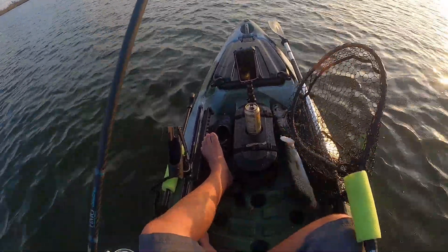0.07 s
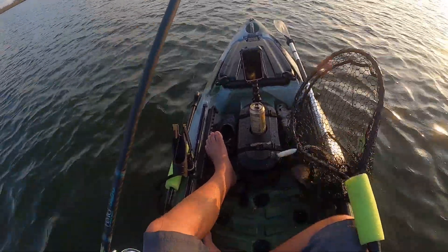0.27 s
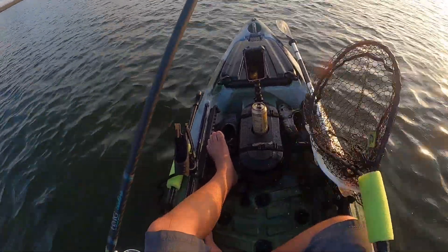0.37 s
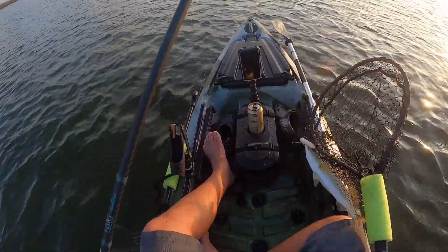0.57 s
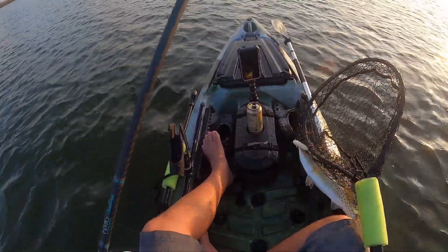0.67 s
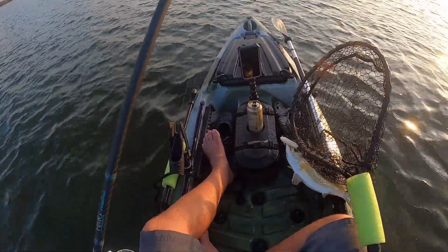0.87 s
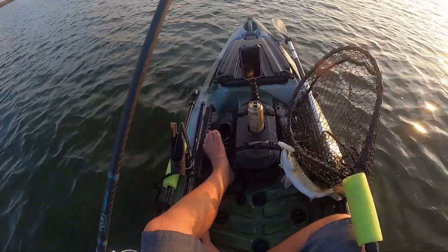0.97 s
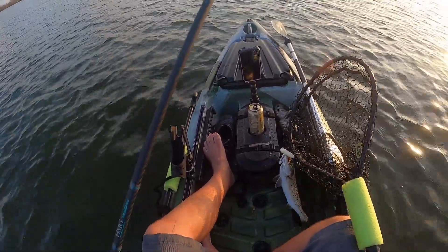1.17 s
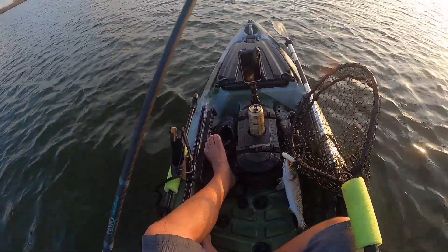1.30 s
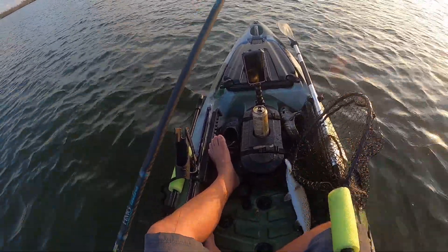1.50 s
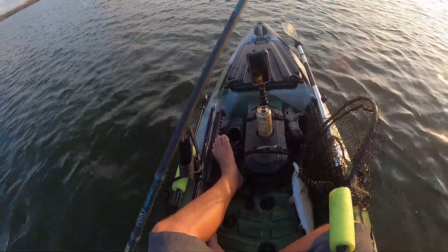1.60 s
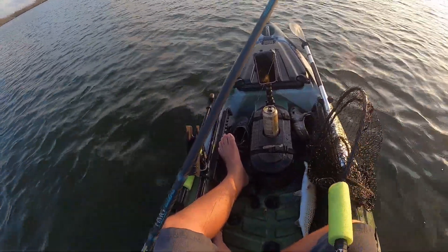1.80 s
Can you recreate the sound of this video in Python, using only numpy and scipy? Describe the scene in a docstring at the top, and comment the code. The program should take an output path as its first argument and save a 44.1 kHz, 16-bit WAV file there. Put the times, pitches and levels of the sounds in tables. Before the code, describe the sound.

A fresh-caught fish thumps a hollow plastic kayak, shakes its wet tail in the net, then slaps the floor again; net ticks and a late frame knock follow, close and dry, with low wind rumble outdoors.

```python
"""First a net ticks and slides over a plastic kayak deck, then a freshly landed fish slaps the hollow hull.
It shakes its wet tail in the mesh, slaps the hull again, and near the end the net frame knocks on the deck.
Wind and water rumble softly underneath.
Hull, deck and frame are sets of decaying tones; skin, mesh, water and wind are shaped noise or tiny clicks."""
import sys
import numpy as np
from scipy import signal
from scipy.fft import rfft, irfft
from scipy.io import wavfile

SR = 44100
rng = np.random.default_rng(int(sys.argv[2]) if len(sys.argv) > 2 else 0)


def output_pcm(signal):
    """Save a mono or channel-first signal as 16-bit PCM at the path in sys.argv[1].

    Samples are clipped to [-1, 1] before scaling.
    """
    pcm = np.clip(np.atleast_2d(signal).T, -1, 1) * 32767
    wavfile.write(sys.argv[1], SR, np.round(pcm).astype(np.int16))


N = 81585
T = np.arange(N) / SR  # time of each sample [s]

# In all tables t60 is the time to fade by 60 dB, and levels are relative.
# The fish hits the hull: (time [s], level [dB], spot [0 side wall, 1 floor], rise [s])
HULL_HITS = [(.2440, -1, 0, 0.014), (1.1863, -19.5, 1, 0.007), (1.192, -7, 1, 0.0053),
             (1.2135, -14.5, 1, 0.0068)]
# Tones of the hollow hull: (pitch [Hz], t60 [s], side wall level [dB], floor level [dB])
HULL_MODES = [(114, 0.43, -37, -11), (154, 0.11, -46, -23), (173, 0.09, -8.5, 1.5), (191, 0.151, -13, -6.5),
              (199.8, 0.23, -10, -25.5), (211.3, 0.09, 3.5, -3), (264.4, 0.042, 4.5, 4.5),
              (308.3, 0.088, -11, -4), (386, 0.051, -7.5, -9), (440, 0.1, -29.5, -14),
              (528.3, 0.049, -13.5, -13), (759, 0.032, -9.5, -9.5), (805, 0.048, -20, -16),
              (952, 0.089, -36, -20.5), (1240, 0.055, -24, -33.5)]
# Wet skin smacks the plastic: (time [s], level [dB], t60 [s], smack pitch [Hz], its share [dB])
SKIN_SLAPS = [(0.2396, -24, 0.035, 4250, -5), (0.243, -32.5, 0.032, 1670, 1.5),
              (1.1815, -45.5, 0.085, 3700, -5), (1.1908, -28.5, 0.033, 1090, -4),
              (1.2002, -37.5, 0.18, 4320, -27), (1.209, -19, 0.029, 3800, -7),
              (1.2245, -39, 0.069, 2990, -15)]
# Spectrum of the smacks: (frequency [Hz], level [dB])
SLAP_COLOUR = [(200, -33.5), (500, -1.5), (800, 12.5), (1200, 0.5), (2200, -6.5), (3000, -2.5), (3800, -4),
               (5000, -10.5), (7300, -15), (9000, -16.5), (10000, -29), (13000, -27.5), (15500, -45)]
# Hard edges of gill cover and fins crack on the deck: (time [s], level [dB])
DECK_HITS = [(.2407, -22), (.3806, -31), (.4104, -31), (1.2110, -19)]
# Ring of the stiff deck skin: (pitch [Hz], level [dB], t60 [s])
DECK_MODES = [(1660, -11.5, 0.01), (3780, -6.5, 0.012), (4400, -8.5, 0.0089), (5330, -3, 0.0037),
              (6860, -9, 0.004)]
# Tail strokes in the wet mesh: (time [s], level [dB], t60 [s], squelch pitch [Hz], its share [dB])
TAIL_STROKES = [(0.3651, -35, 0.048, 7200, 0.5), (0.3767, -24.5, 0.061, 3640, -15),
                (0.378, -31, 0.043, 3670, -8.5), (0.3907, -24.5, 0.1, 1510, 2),
                (0.393, -28.5, 0.057, 1950, -5.5), (0.41, -27, 0.057, 1110, 4),
                (0.4144, -32.5, 0.089, 1580, 1), (0.4288, -46.5, 0.059, 2900, 10),
                (0.435, -32.5, 0.12, 2830, -6.5), (0.442, -26.5, 0.046, 3560, -8.5),
                (0.452, -29.5, 0.05, 2200, -21), (0.4606, -32.5, 0.042, 4220, -5)]
# Spectrum of the strokes: (frequency [Hz], level [dB])
STROKE_COLOUR = [(250, 4), (600, -11), (1020, -2.5), (1350, -11.5), (1620, 1.5), (1850, -7), (2130, -0.5),
                 (2450, -9.5), (3050, -3), (5000, -6.5), (8800, -11.5), (9800, -22), (15500, -32)]
# Mesh and line snap over the deck: (time [s], level [dB], t60 [s], tilt [dB per octave])
NET_TICKS = [(.001, -39.5, 0.03, 4), (0.0238, -34.5, 0.04, 1), (0.0309, -38.5, 0.02, 5.5),
             (0.044, -36, 0.015, -1.5), (0.053, -40.5, 0.029, -5), (0.0661, -40, 0.048, -0.5),
             (0.092, -40.5, 0.018, -18.5), (0.1313, -43.5, 0.022, -6.5), (0.147, -47.5, 0.038, 1.5),
             (0.291, -38, 0.099, 3), (0.297, -47.5, 0.012, 3.5), (0.302, -38, 0.025, 3),
             (0.3182, -40, 0.07, -0.5), (0.336, -49, 0.059, -4), (0.5004, -48, 0.037, 6),
             (0.511, -42.5, 0.037, 4), (0.52, -47, .015, 5), (0.529, -44, 0.31, 3), (0.5535, -38, 0.047, 5),
             (0.561, -38.5, 0.031, 3.5), (0.6332, -39, 0.064, -1), (0.645, -41, .04, -1),
             (0.6602, -32.5, 0.016, -1), (0.665, -38.5, 0.036, 3), (0.6864, -42.5, 0.024, 0.5),
             (0.7264, -48, 0.029, 1), (0.769, -56, 0.034, 0.5), (1.245, -41, 0.039, -8),
             (1.259, -40.5, 0.094, -2), (1.2898, -43, 0.05, 4.5), (1.3266, -50.5, 0.018, 0),
             (1.4635, -48, 0.044, 2), (1.564, -52, 0.018, 7), (1.575, -54, .015, 8),
             (1.5806, -45.5, 0.025, 3)]
# Spectrum of the ticks and the frame's crack: (frequency [Hz], level [dB])
TICK_COLOUR = [(400, -21.5), (900, 0), (1550, 6), (2100, 3), (3000, 6.5), (4300, -0.5), (5200, -1.5),
               (7000, -7.5), (9000, -18), (10000, -21.5), (15500, -34)]
# Mesh and fish slide on the deck:
# (time [s], length [s], level [dB], tilt [dB per octave], rub pitch [Hz], its share [dB])
NET_SLIDES = [(0, 0.072, -60, 7.5, 4260, -36), (0.12, 0.37, -63.5, 3.5, 1630, -28),
              (0.278, 0.21, -55, 5.5, 4000, -23), (0.46, 0.051, -56.5, -6, 4000, -25),
              (0.513, 0.16, -59, 3.5, 3550, 1), (0.658, 0.062, -61.5, 1.5, 2670, -6),
              (1.052, 0.21, -67.5, 2, 3900, -15), (1.45, 0.15, -60, 1.5, 1380, 0),
              (1.521, 0.037, -70.5, 0, 4130, 11), (1.65, 0.44, -60.5, 4, 2370, -0.5)]
# Spectrum of the slides: (frequency [Hz], level [dB])
SLIDE_COLOUR = [(500, -19), (1000, 9.5), (1450, 12), (1950, 7.5), (2450, 4.5), (3200, 1), (4100, 0.5),
                (5200, -8), (7000, -11), (8800, -14.5), (10000, -25.5), (15500, -30.5)]
# Brief squeaks of the wet mesh: (peak time [s], half-width [s], level [dB], pitch [Hz])
MESH_SQUEAKS = [(0.578, 0.0075, -47, 3300), (0.641, 0.009, -56.5, 8080), (1.54, 0.033, -73, 8600)]
# The net frame meets the deck: (time [s], level [dB])
FRAME_HITS = [(1.8322, -22.5), (1.8397, -38)]
# Tones of the frame and deck: (pitch [Hz], level [dB], t60 [s])
FRAME_MODES = [(160, -12, 0.28), (380, -8, 0.047), (650, -2, 0.026), (1090, -16, 0.026), (1260, 4.5, 0.016),
               (1380, -5, 0.015), (1470, -6.5, 0.041), (2310, -11, 0.023), (2660, -4.5, 0.015),
               (3800, -23, 0.033), (4410, -16, 0.028), (6900, -30, .016)]
# Dull bumps of the boat: (time [s], level [dB], pitch [Hz])
BOAT_BUMPS = [(0.815, -21, 49.3)]
# Changing level of the low slosh under the hull: (time [s], level [dB])
SLOSH_LEVEL = [(0, -41), (.08, -65.5), (.16, -50.5), (.3, -49), (.39, -43.5), (.48, -73), (.7, -63),
               (.85, -59), (.95, -55), (1.12, -49.5), (1.35, -69), (1.6, -62.5), (1.85, -61)]
# Spectrum of the slosh: (frequency [Hz], level [dB])
SLOSH_COLOUR = [(150, -6), (280, -0.5), (420, -7.5), (560, -13), (800, -25), (2000, -48)]
# Small waves lap at the hull: (time [s], level [dB], rise [s], t60 [s], tilt [dB per octave])
WAVE_LAPS = [(0.9294, -47.5, 0.00065, 0.094, -11), (.950, -43.5, 0.0025, 0.084, -5.5),
             (0.957, -44.5, 0.011, 0.3, 3.5)]
# Spectrum of the laps: (frequency [Hz], level [dB])
LAP_COLOUR = [(400, -23), (900, 4.5), (1400, 6), (1950, 5.5), (2500, -10), (4000, -16), (4700, -34),
              (9000, -47)]
# Spectrum of the steady water: (frequency [Hz], level [dB])
WATER_COLOUR = [(60, 6), (100, -16.5), (145, 7), (200, -15.5), (245, -7), (305, -9.5), (400, -13.5),
                (700, -21), (1400, -20.5), (2200, -29.5), (4000, -45.5), (8500, -50.5), (10000, -58),
                (15500, -74)]
# Changing level of the wind rumble: (time [s], level [dB])
WIND_LEVEL = [(0, -36.5), (.2, -38.5), (.27, -38.5), (.32, -31), (.39, -32.5), (.45, -42), (.6, -46),
              (.69, -43.5), (.79, -47.5), (.84, -43), (.93, -46.5), (.97, -39), (1.1, -46), (1.3, -38),
              (1.43, -51.5), (1.56, -40.5), (1.85, -39.5)]
# Spectrum of the wind: (frequency [Hz], level [dB])
WIND_COLOUR = [(12, -1), (28, 0.5), (50, -2), (75, -3), (110, -8.5), (170, -12), (300, -23), (700, -106)]

SHARP_RISE_S, SHAKE_RISE_S = .0006, .0016
SNAP_DB, SNAP_RISE_S, SNAP_T60_S = 3, .0003, .014
SQUELCH_Q, SQUEAK_Q, RUB_Q, GRAIN_Q = 4.06, 18, 5.4, 4  # higher Q means a clearer pitch
SHAKE_GRAINS_PER_S, SHAKE_GRAIN_DB = 9000, 3.5
CLUMPS_PER_S, CLUMP_DB = 330, 2.3
SLIDE_GRAINS_PER_S, SLIDE_GRAIN_DB = 9000, 3
SLIDE_FADE_SHARE = 0.048  # of the slide's length
PRESSURE_PER_S, RUB_SPREAD_DB = 160, 1
KNOCK_CRACK_DB, KNOCK_CRACK_T60_S = -18, 0.051
BUMP_RISE_S, BUMP_T60_S = .006, .12
WATER_DB = -50
CUTOFF_HZ = 16000


def from_db(db):
    """Turn decibels into gain."""
    return 10 ** (np.asarray(db) / 20)


def rms_one(x):
    """Scale to an average strength (rms) of one."""
    return x / np.sqrt(np.mean(x ** 2) + 1e-20)


def hiss():
    """White noise."""
    return rng.standard_normal(N)


def coloured(x, colour, tilt_db=0):
    """Give a sound a spectrum, tilted per octave and falling away past both ends; rms 1."""
    hz, db = np.transpose(colour)
    octave = np.log2(np.maximum(np.arange(N // 2 + 1) * SR / N, 1))
    knots = np.log2(hz)
    outside = np.abs(octave - np.clip(octave, knots[0], knots[-1]))
    tilted_db = db + tilt_db * (knots - knots[0])
    shape_db = np.interp(octave, knots, tilted_db) - 12 * outside  # 12 dB per octave
    return rms_one(irfft(rfft(x) * from_db(shape_db), N))


def resonant(x, hz, q):
    """Pass a sound twice through one resonance, which gives it a pitch; rms 1."""
    b, a = signal.iirpeak(min(hz, .4 * SR), max(q, 1), fs=SR)
    once = signal.lfilter(b, a, x)
    return rms_one(signal.lfilter(b, a, once))


def grains(per_s, spread_db):
    """Random tiny slips of uneven size, each ringing a few cycles at one of 16 pitches."""
    pitches = np.geomspace(700, 13000, 16)  # Hz
    sizes = from_db(spread_db * np.minimum(rng.exponential(1, N), 4))
    clicks = (rng.random(N) < per_s / SR) * sizes * rng.choice([-1, 1], N)
    pitch_choice = rng.integers(0, len(pitches), N)
    out = np.zeros(N)
    for k, hz in enumerate(pitches):
        b, a = signal.iirpeak(hz, GRAIN_Q, fs=SR)
        out += signal.lfilter(b, a, clicks * (pitch_choice == k) + 1e-18)
    return out


def flicker(per_s, spread_db):
    """A randomly wandering gain."""
    return from_db(spread_db * np.interp(T * per_s, np.arange(N), hiss()))


def burst(s, rise_s, t60):
    """Envelope that rises at time s and dies away."""
    age = np.maximum(T - s, 0)
    return (1 - np.exp(-age / rise_s)) * np.exp(-np.log(1000) * age / t60)


def contact(s, rise_s, t60):
    """Envelope of a contact: a brief snap added to a tail."""
    snap = from_db(SNAP_DB) * burst(s, SNAP_RISE_S, SNAP_T60_S)
    return .5 * (burst(s, rise_s, t60) + snap)


def ring(s, hz, t60, rise_s):
    """One tone struck at time s and fading."""
    return burst(s, rise_s, t60) * np.sin(2 * np.pi * hz * (T - s))


def hull_thumps():
    """The soft body drives the hollow hull; the spot it hits sets how loud each tone is."""
    out = np.zeros(N)
    for s, db, spot, rise_s in HULL_HITS:
        for hz, t60, *spot_db in HULL_MODES:
            out += from_db(db + spot_db[int(round(spot))]) * ring(s, hz, t60, rise_s)
    return out


def skin_slaps():
    """Wet skin smacks the plastic around each thump: bright noise plus a pitched part."""
    out = np.zeros(N)
    for s, db, t60, hz, share_db in SKIN_SLAPS:
        smack = from_db(share_db) * resonant(hiss(), hz, SQUELCH_Q)
        slap = coloured(hiss(), SLAP_COLOUR) + smack
        out += from_db(db) * burst(s, SHARP_RISE_S, t60) * slap
    return out


def deck_cracks():
    """Each single hard hit sets the deck skin ringing for a few milliseconds."""
    out = np.zeros(N)
    for s, db in DECK_HITS:
        for k, (hz, mode_db, t60) in enumerate(DECK_MODES):
            sign = (-1) ** k  # neighbouring tones start in opposite directions
            out += sign * from_db(db + mode_db) * ring(s, hz, t60, 1 / SR)
    return out


def tail_shakes():
    """Quick gritty strokes against the mesh, each squelching at its own pitch and catching in clumps."""
    out = np.zeros(N)
    for s, db, t60, hz, share_db in TAIL_STROKES:
        slips = coloured(grains(SHAKE_GRAINS_PER_S, SHAKE_GRAIN_DB), STROKE_COLOUR)
        squelch = from_db(share_db) * resonant(hiss(), hz, SQUELCH_Q)
        envelope = contact(s, SHAKE_RISE_S, t60) * flicker(CLUMPS_PER_S, CLUMP_DB)
        out += from_db(db) * envelope * (slips + squelch)
    return out


def net_ticks():
    """Mesh and line snap over the deck: dry bursts of noise, each with its own brightness."""
    out = np.zeros(N)
    for s, db, t60, tilt_db in NET_TICKS:
        noise = coloured(hiss(), TICK_COLOUR, tilt_db)
        out += from_db(db) * contact(s, SHARP_RISE_S, t60) * noise
    return out


def net_slides():
    """The dragged mesh makes small slips and a rubbing pitch; longer drags swell more slowly."""
    out = np.zeros(N)
    for s, length, db, tilt_db, hz, share_db in NET_SLIDES:
        nearest_end = np.minimum(T - s, s + length - T)
        gate = .5 + .5 * np.tanh(nearest_end / (2 * SLIDE_FADE_SHARE * length))
        slips = coloured(grains(SLIDE_GRAINS_PER_S, SLIDE_GRAIN_DB), SLIDE_COLOUR, tilt_db)
        pressure = flicker(PRESSURE_PER_S, RUB_SPREAD_DB)
        rub = from_db(share_db) * pressure * resonant(hiss(), hz, RUB_Q)
        out += from_db(db) * gate * (slips + rub)
    return out


def mesh_squeaks():
    """The wet mesh squeaks: narrow noise that quickly swells and fades."""
    out = np.zeros(N)
    for s, half_width, db, hz in MESH_SQUEAKS:
        swell = np.exp(-2 * ((T - s) / half_width) ** 2)
        out += from_db(db) * swell * resonant(hiss(), hz, SQUEAK_Q)
    return out


def frame_knocks():
    """A hard contact: a crack of noise and the short ring of frame and deck."""
    out = np.zeros(N)
    for s, db in FRAME_HITS:
        tones = sum(from_db(mode_db) * ring(s, hz, t60, SHARP_RISE_S) for hz, mode_db, t60 in FRAME_MODES)
        crack_envelope = from_db(KNOCK_CRACK_DB) * burst(s, SHARP_RISE_S, KNOCK_CRACK_T60_S)
        out += from_db(db) * (tones + crack_envelope * coloured(hiss(), TICK_COLOUR))
    return out


def boat():
    """Water sloshes under the hull as low noise, with a dull bump as a deep fading tone."""
    bumps = sum(from_db(db) * ring(s, hz, BUMP_T60_S, BUMP_RISE_S) for s, db, hz in BOAT_BUMPS)
    slosh_gain = from_db(np.interp(T, *np.transpose(SLOSH_LEVEL)))
    return bumps + slosh_gain * coloured(hiss(), SLOSH_COLOUR)


def water():
    """A steady wash of noise round the hull, and a small lapping wave made of noise bursts."""
    out = from_db(WATER_DB) * coloured(hiss(), WATER_COLOUR)
    for s, db, rise_s, t60, tilt_db in WAVE_LAPS:
        out += from_db(db) * burst(s, rise_s, t60) * coloured(hiss(), LAP_COLOUR, tilt_db)
    return out


def wind():
    """Low buffeting on the microphone: deep noise whose level rises and falls."""
    gain = from_db(np.interp(T, *np.transpose(WIND_LEVEL)))
    return gain * coloured(hiss(), WIND_COLOUR)


def scene():
    """Add all sources into one channel, with no echo, as in open air."""
    fish = hull_thumps() + skin_slaps() + deck_cracks() + tail_shakes()
    net = net_ticks() + net_slides() + mesh_squeaks() + frame_knocks()
    return (fish + net + boat() + water() + wind())[None]


def record(dry):
    """Cut the highest treble steeply."""
    low_pass = signal.ellip(10, .1, 80, CUTOFF_HZ, fs=SR, output="sos")
    return signal.sosfilt(low_pass, dry)


dry = scene()
out = record(dry)
output_pcm(out)
```